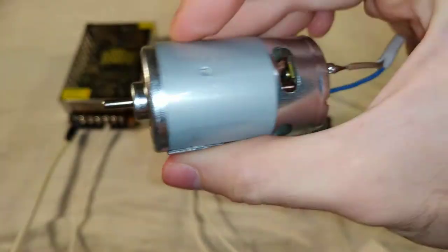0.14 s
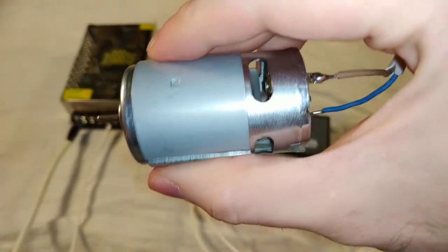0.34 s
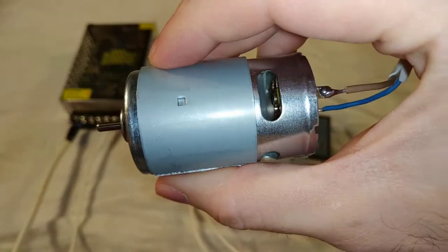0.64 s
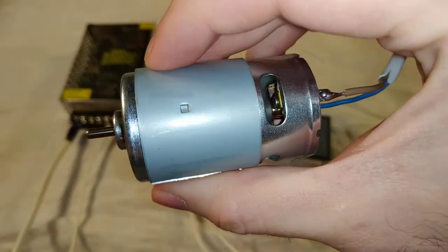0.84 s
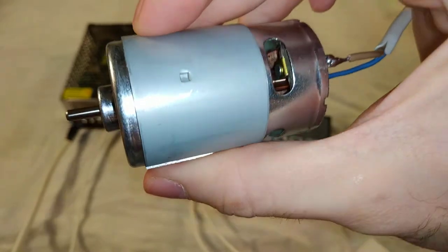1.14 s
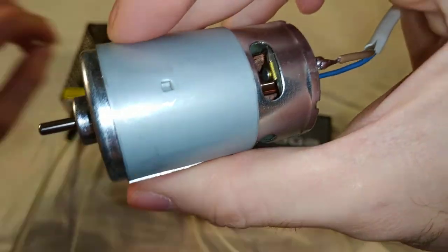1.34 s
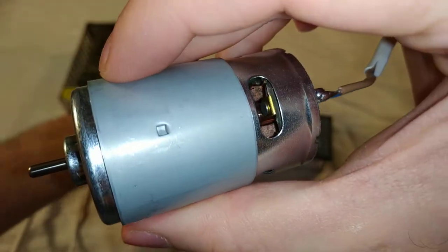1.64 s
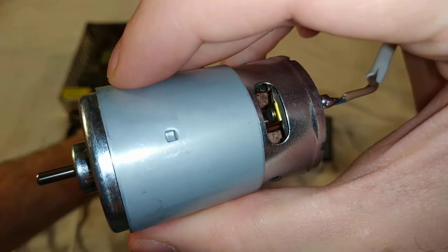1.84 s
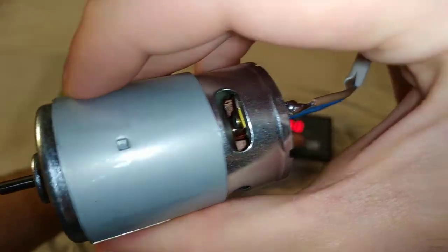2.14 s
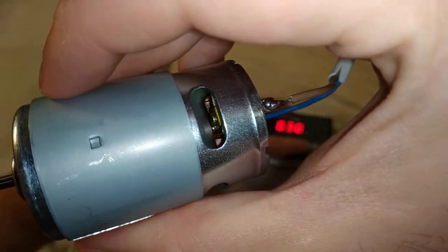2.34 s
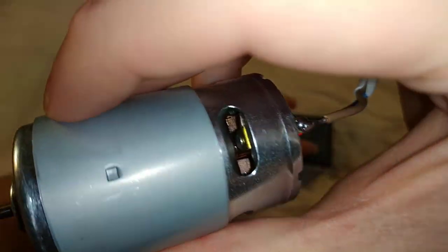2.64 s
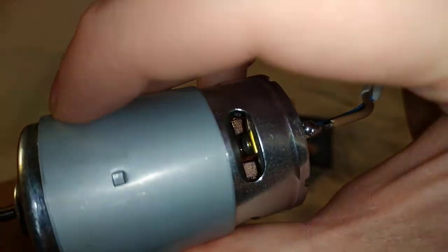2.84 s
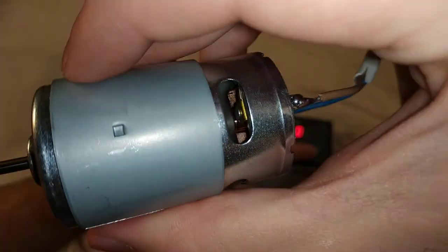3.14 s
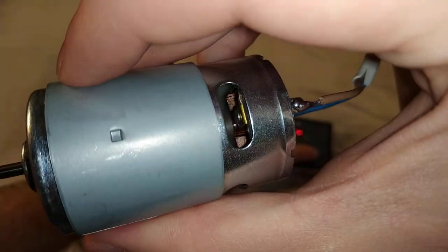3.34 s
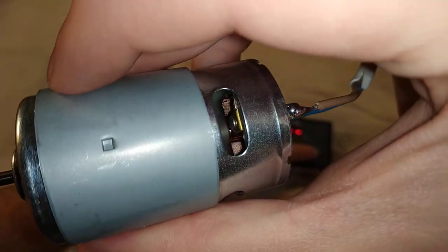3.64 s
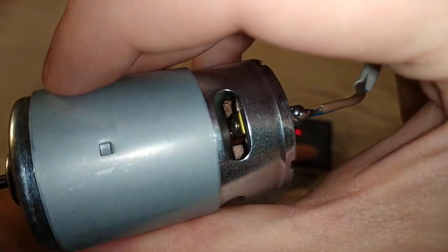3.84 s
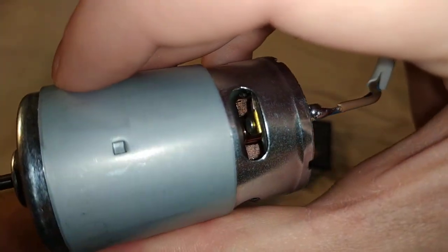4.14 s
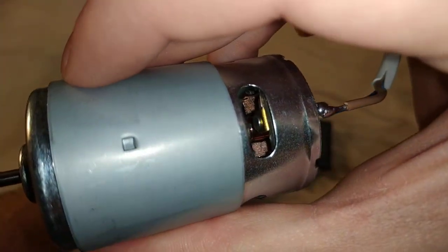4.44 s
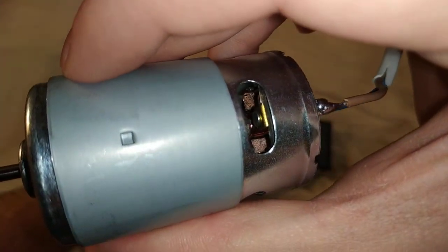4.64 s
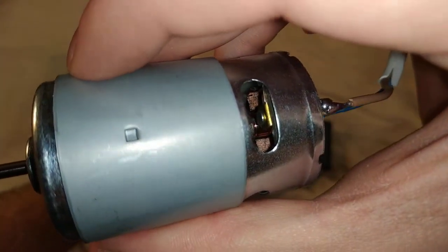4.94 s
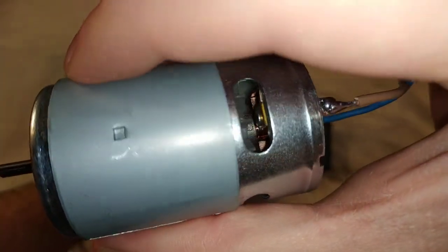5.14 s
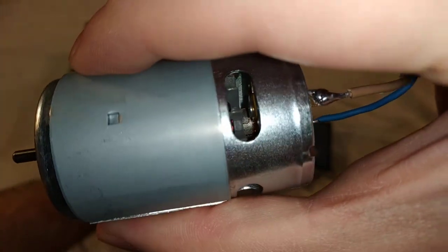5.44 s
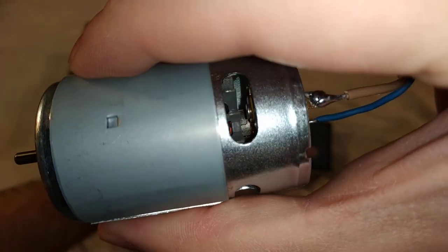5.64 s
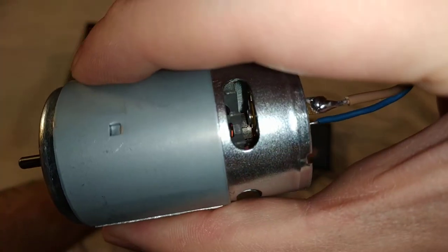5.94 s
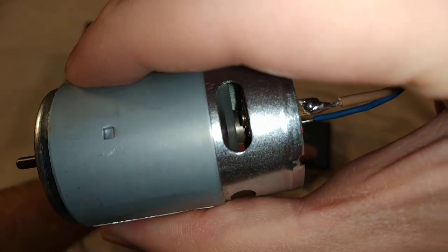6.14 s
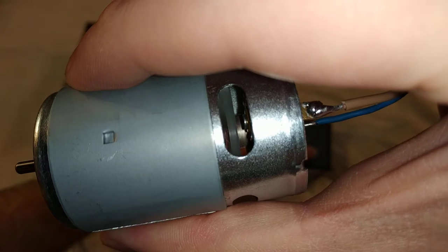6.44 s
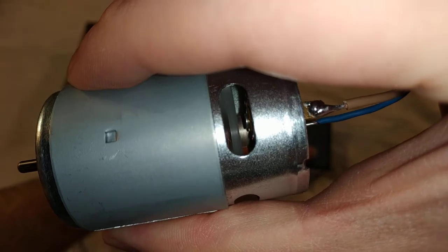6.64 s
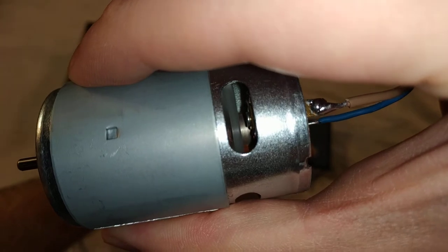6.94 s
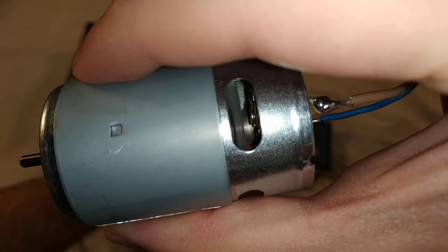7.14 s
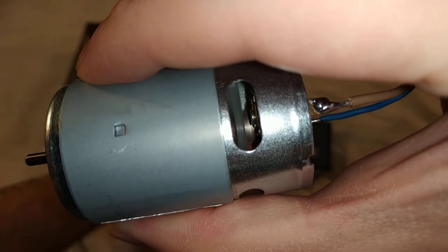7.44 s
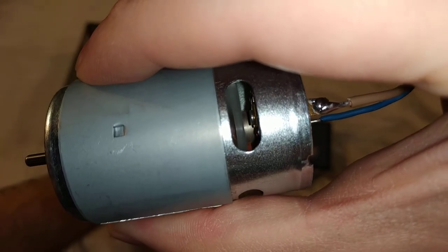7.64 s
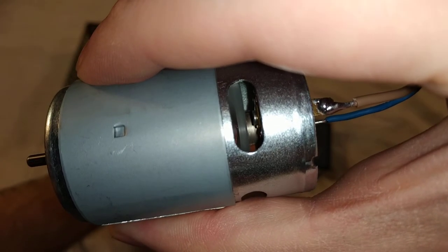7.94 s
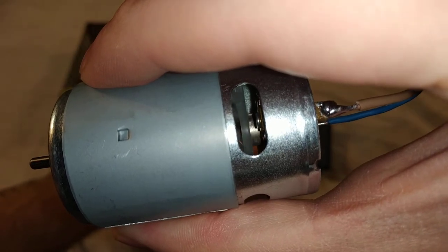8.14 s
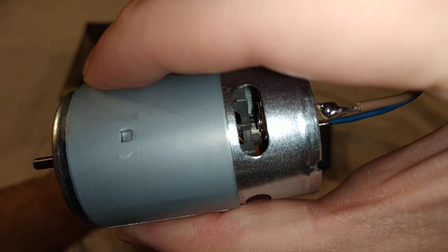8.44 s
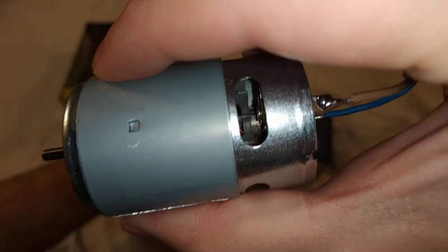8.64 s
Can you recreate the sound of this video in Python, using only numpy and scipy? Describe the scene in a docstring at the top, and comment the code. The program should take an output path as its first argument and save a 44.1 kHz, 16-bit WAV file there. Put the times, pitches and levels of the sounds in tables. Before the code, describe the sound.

A small electric motor whines and hisses steadily, winds down to a rattling stop, clicks twice, then briefly spins up and dies away again.

```python
"""In a quiet, small furnished room, a little brushed DC motor held in the hand runs at full speed.
It is turned down to a stop, the speed knob clicks, and the motor swells up and dies away once more.
At the end the hand moves with a rustle; just before a thin rising squeak there is a faint soft tap.
One shaft angle times the whine, the knocks and ticks of the commutator, the bearings' rattle and the
brushes' rasp and chatter; filtered noise makes air and skin, and dying sine waves make bumps and clicks."""
import sys
import numpy as np
from scipy import signal
from scipy.io import wavfile
from scipy.ndimage import uniform_filter1d

SR = 44100
rng = np.random.default_rng(int(sys.argv[2]) if len(sys.argv) > 2 else 0)


def pcm_store(signal):
    """Save signal as 16-bit PCM."""
    levels = np.round(np.clip(np.atleast_2d(signal), -1, 1) * 32767)
    wavfile.write(sys.argv[1], SR, levels.astype(np.int16).T)


N = 388074
T = np.arange(N) / SR  # time of every sample, seconds
FULL_SPEED = 112.5  # turns a second that count as speed 1


def gain_of(db):
    """Turns decibels into a factor to multiply by."""
    return 10 ** (np.asarray(db) / 20)


def evened(x):
    """Scales a signal so that its rms (its average strength) is 1."""
    return x / np.sqrt(np.mean(x ** 2) + 1e-20)


def drifting(shape, size, **options):
    """Random wandering of rms 1: noise smoothed over size steps."""
    return evened(uniform_filter1d(rng.standard_normal(shape), size=size, **options))


def read(points, hz):
    """Reads a table of (pitch, value) at any pitch, on a logarithmic pitch axis."""
    table_hz, value = np.transpose(points)
    return np.interp(np.log(hz + 1), np.log(table_hz + 1), value)


def curve(rows, axis=1):
    """Reads one column of a time table at every sample."""
    rows = np.array(rows)
    return np.interp(T, rows[:, 0], rows[:, axis])


def add(mix, start_s, sound):
    """Adds a sound into the mix at a given time."""
    part = mix[round(start_s * SR):][:len(sound)]
    part += sound[:len(part)]


def coloured(x, points, size=2048):
    """Filters a sound to a given colour; the filter has energy 1 and answers only after the input."""
    level_db = np.maximum(read(points, abs(np.fft.fftfreq(size, 1 / SR))), -100)
    log_gain = np.log(gain_of(level_db))
    taps = np.fft.ifft(np.exp(np.conj(signal.hilbert(log_gain)))).real
    taps /= np.linalg.norm(taps)
    return signal.oaconvolve(np.atleast_2d(x), taps[None], axes=1)[:, :N]


def pair(x, likeness):
    """Makes two unrelated channels partly alike: 0 is unrelated, 1 is identical."""
    c = np.clip(likeness, 0, 1)
    return np.array([x[0], c * x[0] + np.sqrt(1 - c * c) * x[1]])


def panned(x, db):
    """Makes the left channel louder than the right by db; a negative value favours the right."""
    return x * gain_of(np.array([db, -db]).reshape(2, -1) / 2)


def noise(points, likeness):
    """Stereo noise of the given colour."""
    return coloured(pair(rng.standard_normal((2, N)), likeness), points)


def low_cut(x, hz=190, order=4):
    """Takes out the bass, which the small microphone hardly hears."""
    return signal.sosfilt(signal.butter(order, hz, "highpass", fs=SR, output="sos"), x)


def dying_note(t, hz, t60, db=0):
    """A sine wave that starts at db and falls by 60 dB in t60 seconds."""
    return gain_of(db - 60 * t / t60) * np.sin(2 * np.pi * hz * t)


def pulses(turns, angles, sizes, jitter_s):
    """One pulse each time the shaft passes an angle; sizes is turns x angles."""
    when = np.interp(np.arange(len(sizes))[:, None] + angles, turns, T)
    when = when + jitter_s * rng.standard_normal(when.shape)
    at = np.clip(when * SR, 2, N - 4).ravel()
    # a pulse falls between samples, so it is shared among the four nearest
    near = at.astype(int) + np.arange(-1, 3)[:, None]
    share = np.sinc(near - at) * np.sinc((near - at) / 2)
    return np.bincount(near.ravel(), (sizes.ravel() * share).ravel(), N)


# colour of the quiet room's noise: (pitch_hz, relative level_db)
QUIET_COLOUR = [(15, -53), (25, -9), (38, -63), (87, -16), (134, -19.5), (200, 3.5), (223, 0), (641, -8),
                (1330, -12), (1740, -13), (2000, -13.5), (2550, -12.5), (5000, -13.5), (16000, -10)]


def quiet_room():
    """The faint steady noise of the quiet room, nearly unrelated left and right."""
    return gain_of(-57.5) * noise(QUIET_COLOUR, 0.045)


# how long echoes last at each pitch: (pitch_hz, t60_s, the time to fall by 60 dB)
ECHO_TIMES = [(150, 0.089), (900, 0.19), (4000, 0.3), (9000, 0.17), (16000, 0.067)]


def room_echo(x, size=16384):
    """A small furnished room: a smooth noise-like tail in which middle pitches last longest."""
    first_echo_s = .003
    taps = rng.standard_normal((2, size)) * (np.arange(size) > first_echo_s * SR)
    hz, t, spectrum = signal.stft(taps, SR, nperseg=256)
    fade = gain_of(-60 * t / read(ECHO_TIMES, hz)[:, None])
    tail = signal.istft(spectrum * fade, SR, nperseg=256)[1]
    return signal.oaconvolve(x, tail / np.linalg.norm(tail[0]), axes=1)[:, :N]


# colour of the air stirred by the rotor: (pitch_hz, relative level_db)
AIR_COLOUR = [(30, -49), (70, -26), (120, -14), (210, 8), (330, 5), (600, -6), (950, -9.5), (1300, -5.5),
              (2500, -9), (4000, -11)]


def stirred_air(speed):
    """The spinning rotor stirs the air: a soft noise that grows with speed."""
    return panned(gain_of(-52.0) * speed ** 1.62 * noise(AIR_COLOUR, 0.69), -11)


# colour of skin and sleeve: (pitch_hz, relative level_db)
RUSTLE_COLOUR = [(35, -95), (60, -85), (198, -6), (262, -5), (338, 2.5), (698, -9), (842, 3), (991, -12.5),
                 (1470, -18), (4030, -26), (4420, -34), (10300, -24), (16000, -30)]
# one list for each movement of the hand: (time_s, level_db)
HAND_MOVES = [
    [(4.95, -88), (5.25, -65), (5.55, -71), (6, -70)],
    [(8.22, -73), (8.38, -64), (8.5, -53.5), (8.6, -53), (8.68, -48.5), (8.8, -48.5)],
]
# thin squeaks as the hand moves off: (start_s, start_pitch_hz, end_pitch_hz, end level_db)
SQUEAKS = [(8.69, 6000, 7200, -56), (8.7, 6700, 9200, -55), (8.73, 7600, 10500, -53),
           (8.62, 8800, 13000, -61), (8.73, 14200, 15700, -59)]


def hand():
    """Skin and sleeve rustle as the hand shifts; at the last, thin sine tones rise as a squeak."""
    level = 0
    for rows in HAND_MOVES:
        level = level + gain_of(np.interp(T, *np.transpose(rows), left=-120, right=-120))
    squeak = np.zeros(N)
    for start_s, start_hz, end_hz, db in SQUEAKS:
        u = np.linspace(0, 1, N - round(start_s * SR))
        hz = start_hz + (end_hz - start_hz) * u
        hz = hz + 110 * drifting(len(u), 30)  # the pitch trembles by about 110 Hz
        add(squeak, start_s, gain_of(db) * u ** 0.74 * np.sin(2 * np.pi * np.cumsum(hz) / SR))
    return panned(level * noise(RUSTLE_COLOUR, 0.79) + squeak, -4.5)


# dull finger bumps: (start_s, relative level_db, ring pitch_hz, ring t60_s, thud level_db against the ring)
FINGER_BUMPS = [(1.97, -5, 980, 0.0064, -13), (1.979, -16, 720, 0.0089, -6.5),
                (3.2193, -9, 900, 0.0049, -25), (3.5056, -14.5, 930, 0.014, -11.5),
                (7.0546, -9.5, 940, 0.0058, -22), (7.305, -14.5, 910, 0.012, -12),
                (8.508, -22.5, 1060, 0.0097, -31), (8.516, -30, 970, 0.014, -22),
                (8.795, -27, 800, 0.0059, 0)]


def bumps():
    """A soft finger blow sets off one short note, a low thud and a tap, and faintly rings the can."""
    out, t = np.zeros(N), np.arange(SR // 10) / SR
    tap = dying_note(t, hz=1600, t60=0.0057, db=-9)
    snap = dying_note(t, hz=4300, t60=0.0081, db=-26)
    soft_start = 1 - np.exp(-t / 0.0058)
    for start_s, db, hz, t60, thud_db in FINGER_BUMPS:
        add(out, start_s, gain_of(min(db - 3, 0)) * snap)  # firmer blows ring the can more
        ring = dying_note(t, hz, t60)
        thud = dying_note(t, hz=420, t60=0.016, db=thud_db)
        add(out, start_s, gain_of(db + 12.5) * (ring + thud + tap) * soft_start)
    return panned(out, -0.38)


# two clicks of the knob's switch, then a faint soft tap just before the squeak:
# (start_s, relative level_db, brightness_db an octave, second blow after_s, its relative level_db)
CLICKS_AND_TAP = [(5.6156, -15, 4, .00147, 6), (5.838, -14, -1, .0022, 6.5), (8.514, -46, 9, 0.00124, 9.5)]
# notes of the switch: (pitch_hz, relative level_db, t60_s)
SWITCH_NOTES = [(274, -28, 0.035), (560, -21.5, 0.016), (930, -10.5, 0.011), (2340, -23.5, 0.013),
                (4130, -22, 0.007), (5270, -21, 0.0035), (8550, -20.5, 0.0023), (10600, -23, 0.0036)]
# weak, longer-lasting notes of the knob: (pitch_hz, relative level_db, t60_s)
KNOB_NOTES = [(890, -31.5, .12), (2480, -39.5, .12), (4150, -43, .06), (5400, -42, .05)]


def switch_and_tap():
    """The contact snaps over and seats a moment later, each blow a ring and a crack; so is the soft tap."""
    crack_db, crack_t60, crack_hz = -32, 0.031, (3800, 9000)
    crack_filter = signal.butter(1, crack_hz, "bandpass", fs=SR)
    out, t = np.zeros(N), np.arange(SR // 10) / SR
    sharp_start = 1 - np.exp(-t / 0.000087)
    for start_s, db, bright, second_s, second_db in CLICKS_AND_TAP:
        ring = 0
        for hz, note_db, t60 in SWITCH_NOTES + KNOB_NOTES:
            # tilts the notes around 1200 Hz: a positive brightness lifts the higher ones
            ring = ring + dying_note(t, hz, t60, note_db + bright * np.log2(hz / 1200))
        for delay_s, blow_db in ((0, -2), (second_s, second_db)):
            grit = signal.lfilter(*crack_filter, rng.standard_normal(len(t)))
            crack = gain_of(crack_db + 3.9 * bright - 60 * t / crack_t60) * grit
            add(out, start_s + delay_s, gain_of(db + blow_db) * (ring + crack) * sharp_start)
    return panned(out, 0.38)


# runs of the motor, also read by the brushes and the whine:
# (turned up at_s, turned down at_s, top speed in turns a second before the slow creep)
MOTOR_RUNS = [(-.908, 3.225, 112.26), (5.873, 7.066, 111.52)]
SECOND_RUN_S = MOTOR_RUNS[1][0]
# spin-up: a steady climb that settles onto the top speed, which creeps up as the bearings warm
CLIMB_HZ_PER_S, SETTLE_HZ, SETTLE_S, CREEP_HZ_PER_S = 136.4, 7.4, .12, .1
# spin-down: the braking sets in softly and grows until the shaft stands
BRAKE_HZ_PER_S, BRAKE_ONSET_S, BRAKE_HZ_PER_S2 = 67.6, .184, 103.4
STICK_S, LOOSEN_S = .075, .07  # the shaft sticks at first, then breaks loose


def shaft():
    """Turns a second: in each run the shaft climbs, settles, and is braked to a stop."""
    hz = np.zeros(N)
    for on_s, off_s, top in MOTOR_RUNS:
        age, late = np.maximum(T - on_s, 0), np.maximum(T - off_s, 0)
        settling = np.maximum(age - (top - SETTLE_HZ) / CLIMB_HZ_PER_S, 0)
        settled = top - SETTLE_HZ * np.exp(-settling / SETTLE_S)
        driven = np.minimum(CLIMB_HZ_PER_S * age, settled) + CREEP_HZ_PER_S * age
        soft_onset = late - BRAKE_ONSET_S * (1 - np.exp(-late / BRAKE_ONSET_S))
        braked = BRAKE_HZ_PER_S * soft_onset + BRAKE_HZ_PER_S2 * late ** 2 / 2
        loose = np.clip((age - STICK_S) / LOOSEN_S, 0, 1)
        hz += np.maximum(driven - braked, 0) * loose
    return hz


# colour of the bearings' rattle: (pitch_hz, relative level_db)
RATTLE_COLOUR = [(150, -23), (450, -3), (700, -5.5), (880, 1), (1080, -4.5), (1300, -9), (2500, -11.5),
                 (3500, -14.5), (8000, -21)]


def bearings(turns, speed, count=24):
    """Loose bearings rattle in small uneven knocks, count a turn, softened towards full speed."""
    rattle_db, uneven_db, soften_db = -30, 4, -13
    shape = (2, int(turns[-1]), count)
    sizes = gain_of(uneven_db * rng.standard_normal(shape)) * rng.choice([-1, 1], shape)
    angles = np.arange(count) / count
    grains = np.array([pulses(turns, angles, side, jitter_s=3e-4) for side in sizes])
    rattle = coloured(pair(grains, 0.66), RATTLE_COLOUR)
    return panned(rattle * speed * gain_of(rattle_db + soften_db * speed ** 2), -7.5)


# commutator gaps passing the two brushes: (angle in turns, relative level_db)
COMMUTATOR_GAPS = [(0, 1), (.167, 1.5), (.333, -1), (.5, -4), (.667, -2), (.833, -3)]
# colour of one knock of the commutator: (pitch_hz, relative level_db)
KNOCK_COLOUR = [(100, -17), (220, -12), (480, -3), (750, 4), (1000, 2), (1300, -16), (1800, -15),
                (2500, -16), (3300, -20), (5000, -12), (12000, -34)]
# colour of the tick of the one high commutator bar: (pitch_hz, relative level_db)
TICK_COLOUR = [(200, -14), (750, -2), (1000, -2), (1350, -9), (1900, -1), (2700, -1), (3400, -14),
               (5000, -10), (12000, -32)]
KNOCK_UNEVEN_DB, KNOCK_JITTER_S = 2.2, 6e-5  # the knocks are nearly regular
KNOCK_DB, KNOCK_SOFTEN_DB = -28, -20  # softened in step with speed
TICK_ANGLE, TICK_DB, TICK_SOFTEN_DB = .36, -26.5, -13  # angle in turns


def commutator(turns, speed, crawl=0.32):
    """Each gap knocks the can and one high bar ticks once a turn; at a crawl the knocks come apart."""
    angles, db = np.transpose(COMMUTATOR_GAPS)
    count = int(turns[-1])
    sizes = gain_of(db + KNOCK_UNEVEN_DB * rng.standard_normal((count, len(angles))))
    knocks = coloured(pulses(turns, angles, sizes, KNOCK_JITTER_S), KNOCK_COLOUR)
    knocks = knocks * gain_of(KNOCK_DB + KNOCK_SOFTEN_DB * speed)
    sizes = gain_of(KNOCK_UNEVEN_DB * rng.standard_normal((count, 1)))
    ticks = coloured(pulses(turns, np.array([TICK_ANGLE]), sizes, KNOCK_JITTER_S / 2), TICK_COLOUR)
    ticks = ticks * gain_of(TICK_DB + TICK_SOFTEN_DB * speed ** 2)
    # both fade out below the crawling speed, a share of full speed
    return panned((knocks + ticks) * np.minimum(speed / crawl, 1), -5.0)


def rasp(turns, fresh=1.0, jitter_s=2e-6, count=160):
    """The brushes meet the same scratches each turn; the pattern wears slowly and trembles over a few turns."""
    shape = (int(turns[-1]), count)
    worn = drifting(shape, 130, axis=0, mode="wrap")
    tremble = evened(signal.lfilter([1], [1, -.62], rng.standard_normal(shape), axis=0))
    angles = (np.arange(count) + rng.random(count)) / count
    return evened(pulses(turns, angles, worn + fresh * tremble, jitter_s))


# brush chatter, once a turn: (angle in turns, relative level_db, middle pitch_hz, length_s)
CHATTER_SPOTS = [(.83, -11.5, 10420, 0.00074), (0.97, -15.5, 12140, 0.00106), (.2, -14.5, 6800, 0.00104),
                 (0.46, -6, 8760, 0.00113), (0.27, -34, 5900, 0.00093)]
WANDER_DB = 2.8  # how far the chatter's loudness wanders slowly


def chatter(turns, jitter_s=8e-6, sweep=0.31):
    """At a few angles a brush hops and buzzes for about a millisecond, its note sagging as it settles."""
    out, shape = np.zeros((2, N)), (int(turns[-1]), 1)
    for angle, db, hz, length_s in CHATTER_SPOTS:
        wander = drifting(shape, 60, axis=0, mode="wrap")
        sizes = rng.uniform(.7, 1.3, shape) * gain_of(WANDER_DB * wander)
        hops = pulses(turns, np.array([angle]), sizes, jitter_s)
        u = np.linspace(0, 1, round(length_s * SR))
        # the note falls from a share sweep above the middle pitch to as far below
        phase = 2 * np.pi * hz * length_s * (u + sweep * u * (1 - u))
        swell = np.sin(np.pi * np.sqrt(u)) ** 2
        buzz = swell * np.sin(phase + np.array([[0], [1.5]]))
        out += gain_of(db) * evened(signal.oaconvolve(hops[None], buzz, axes=1)[:, :N])
    return out


# brush noise grows as a power of the speed and levels off near the knee (a share of full speed)
BRUSH_DB, BRUSH_POWER, BRUSH_KNEE = -19, 1.85, 1
DIP_DB, DIP_AFTER_S, DIP_WIDTH_S = -3, 0.22, 0.018  # the brushes ease briefly after the turn-down


def brush_level(speed, second_db=0.6):
    """Gain of the brush noise: it follows the speed, and dips as the drive lets go."""
    growth = (speed / BRUSH_KNEE) ** BRUSH_POWER
    dip = 0
    for _, off_s, _ in MOTOR_RUNS:
        dip = dip + np.exp(-((T - off_s - DIP_AFTER_S) / DIP_WIDTH_S) ** 2)
    level_db = BRUSH_DB + DIP_DB * dip + second_db * (T > SECOND_RUN_S)
    return gain_of(level_db) * growth / np.hypot(1, growth)


# colour of the brush noise as the motor is held at first: (pitch_hz, relative level_db)
FIRST_COLOUR = [(1760, -32), (3000, -17.5), (3220, -24), (3590, -6.5), (4070, -7.5), (4360, 2), (6250, 5.5),
                (6840, 4.5), (8080, -1.5), (10300, 5.5), (11200, 3), (14200, 8), (15700, 2)]
# the same with the motor held nearer: (pitch_hz, relative level_db)
NEAR_COLOUR = [(1760, -26.5), (3000, -9.5), (3220, -34), (3400, -9), (3880, -23), (4150, 0.5), (4650, -3.5),
               (4950, 1.5), (5500, -2), (6500, 3), (8130, -3), (9300, -5), (10600, 5.5), (11800, -7.5),
               (14700, 3), (15700, -6.5)]
# the same in the second run: (pitch_hz, relative level_db)
SECOND_COLOUR = [(1760, -25.5), (2950, -8.5), (3300, -25), (3700, -8.5), (3900, -23.5), (4080, 3),
                 (4450, 5), (4700, 5), (4950, 7.5), (5600, 2.5), (6400, 5.5), (7910, 2.5), (8800, 9),
                 (9900, -7), (10600, 5), (11700, -4.5), (12600, 6.5), (13400, 5), (14100, 7), (15100, -3),
                 (15700, 5.5)]
# where the hand holds the motor, one list a run: (time_s, left over right_db)
HAND_HOLD = [
    [(0.0, -1.5), (0.3, -3), (1.95, -4), (2.28, -1.5), (3.38, -3), (4.1, -4)],
    [(6.05, -5), (7.33, -1.5), (7.368, -4), (7.88, -3.5), (7.956, -4), (8.0, -6)],
]
THIN_HZ, THIN_DB = (3900, 6700), -6  # the brush noise thins out in this band at full speed


def brushes(turns, speed):
    """Rasp, smooth sliding hiss and chatter; the hiss takes over when the shaft crawls."""
    slide_db, crawl_db = -19, -2
    chatter_db, second_chatter_db, far_chatter_db = 1, -2, -7
    scratches = pair([rasp(turns), rasp(turns)], 0.18) * speed ** .5
    hiss_level = gain_of(slide_db) + gain_of(crawl_db) * (1 - speed) ** 2
    drive = scratches + hiss_level * pair(rng.standard_normal((2, N)), 0.089)

    near = curve([(1.7, 0.14), (2.3, 0.76)])  # (time_s, share of the nearer colour)
    second = T > SECOND_RUN_S
    first = (1 - near) * coloured(drive, FIRST_COLOUR) + near * coloured(drive, NEAR_COLOUR)
    sound = np.where(second, coloured(drive, SECOND_COLOUR), first)
    buzz_db = chatter_db + second_chatter_db * second + far_chatter_db * (near[-1] - near)
    sound = sound + gain_of(buzz_db) * speed ** .5 * chatter(turns)

    # even out the slow changes of loudness before the level and thinning are set
    sound /= np.sqrt(uniform_filter1d((sound ** 2).mean(0), size=6000))
    thin_filter = signal.butter(3, THIN_HZ, "bandpass", fs=SR, output="sos")
    band = signal.sosfiltfilt(thin_filter, sound)
    sound = sound - (1 - gain_of(THIN_DB)) * speed ** 8 * band
    return panned(sound, curve(np.vstack(HAND_HOLD))) * brush_level(speed)


# response of the can to the rotor: (pitch_hz, level_db)
CAN_RESPONSE = [(60, -30), (150, -24), (330, -11), (520, -4), (670, -6), (850, 0), (1050, 0), (1170, -9),
                (1500, -7), (1900, -6), (2400, -9), (3800, -12), (4200, 9), (8000, 6)]
RING_HZ, RING_WIDTH_HZ, RING_DB = 886, 90, 1.5  # the sharpest resonance of the can


def can_db(hz):
    """The can's broad response with its one sharp ring on top."""
    return read(CAN_RESPONSE, hz) + RING_DB * np.exp(-((hz - RING_HZ) / RING_WIDTH_HZ) ** 2)


# the even comb of weak lines at low multiples of the shaft speed: (pitch_hz, relative level_db)
WEAK_LINES = [(330, -60), (450, -62), (680, -64), (850, -66), (1150, -63), (1750, -68), (2250, -66),
              (2700, -71), (3150, -66), (4000, -62)]
# lines that stand out at full speed:
# (multiple of the shaft speed, relative level_db in the first run, relative level_db in the second)
LOUD_LINES = [(3, -54, -53), (5, -55.5, -57), (6, -60, -58), (7, -58, -56), (9, -46, -46.5), (10, -58, -59),
              (11, -60, -59), (12, -59, -61), (14, -56, -59), (17, -58, -57), (19, -56, -56),
              (20, -57, -60), (21, -56, -61), (24, -56, -64), (26, -53.5, -58), (27, -54, -58),
              (31, -55, -63), (34, -56, -55), (38, -38, -44), (40, -35.5, -36), (43, -43, -46),
              (44, -38, -39), (47, -40, -45), (50, -46, -41), (51, -39.5, -42), (53, -45, -55),
              (57, -46, -37), (59, -42, -48), (60, -38.5, -43), (61, -36.5, -38), (63, -37.5, -43),
              (64, -38, -37), (76, -41, -44), (93, -38, -45), (95, -40, -52), (116, -42, -46),
              (126, -39, -40), (130, -41, -46)]
# the rotor's teeth tug at the magnets, heard below full speed:
# (multiple of the shaft speed, relative level_db)
TOOTH_TUGS = [(3, -42), (6, -46), (8, -48), (9, -46), (10, -51), (12, -44), (15, -54), (16, -48), (18, -49),
              (24, -53), (30, -57)]
COG_SPEED = 0.49  # the tugging fades under this share of full speed
WHINE_DB, WHINE_FADE = .5, 1  # overall gain, and the least power of the speed with which lines fade
HUM_ROUGH = .25  # unsteadiness of the low hum under the main whine


def whine(turns, speed, count=36, size=64):
    """Clean multiples of the shaft speed, each swelling as it slides through a resonance of the can."""
    scatter_db, waver_db, fade_hz, rough = -0.5, 1.5, 1000, 1.0
    out, slow, t = np.zeros((2, N)), speed[::size], T[::size]  # levels need only every 64th sample
    lines = {}
    for k in range(3, count + 1):
        lines[k] = read(WEAK_LINES, k * FULL_SPEED) + scatter_db * rng.standard_normal()
    for k, first_db, second_db in LOUD_LINES:
        lines[k] = np.where(t > SECOND_RUN_S, second_db, first_db)  # replaces any weak line
    tugs = dict(TOOTH_TUGS)
    slack = np.clip(1 - slow ** 4, 0, 1)  # 0 at full speed

    for k, db in lines.items():
        hz = k * FULL_SPEED
        waver = np.interp(t, np.linspace(0, T[-1], 45), rng.standard_normal(45))
        db = db + min(hz / 2500, 1) * waver_db * waver  # high lines waver more
        power = WHINE_FADE + min(hz / fade_hz, 7) ** 2 / 4  # high lines need speed
        driven = gain_of(db - can_db(hz)) * slow ** power
        if k > count:  # high lines turn rough below full speed
            driven = driven * (1 + rough * np.sqrt(slack) * drifting(len(t), 6))
        if k < 9:
            hum = np.abs(1 + HUM_ROUGH * drifting(len(t), 14))
            driven = driven * hum / np.hypot(1, HUM_ROUGH)
        cogging = gain_of(tugs.get(k, -120)) * slack * np.sqrt(slow) * np.minimum(slow / COG_SPEED, 1)
        strength = np.hypot(driven, cogging) * gain_of(can_db(hz * slow))
        strength = np.interp(T, t, strength)
        phase = (2 * np.pi * ((k * turns + rng.random()) % 1)).astype(np.float32)
        lag = np.float32(min(hz / 1200, 1.4))  # radians: the left, far microphone port hears it later
        out += strength * np.array([np.cos(phase - lag), np.cos(phase)])
    return panned(gain_of(WHINE_DB) * out, -2.5)


def scene():
    """The motor, the knob and the hand in a quiet room."""
    shaft_hz = uniform_filter1d(shaft(), size=2000)
    flutter = 0.000223 * drifting(N, 1500)  # tiny unsteadiness, a share of the speed
    turns = np.cumsum(np.maximum(shaft_hz * (1 + flutter), 1e-6)) / SR
    speed = np.maximum(shaft_hz, 0) / FULL_SPEED

    motor = bearings(turns, speed) + commutator(turns, speed) + brushes(turns, speed)
    close = low_cut(motor + bumps()) + stirred_air(speed) + hand()
    clicks = low_cut(switch_and_tap(), hz=260, order=2)
    lines = low_cut(whine(turns, speed))
    echo = room_echo(gain_of(-6.5) * close + gain_of(-21.5) * lines + gain_of(-6.0) * clicks)
    return quiet_room() + echo + close + clicks + lines


EDGE_HZ = 15850  # the treble ends here


def record(dry):
    """Cuts off the highest treble with a steep, symmetrical low-pass filter."""
    taps = signal.firwin(511, EDGE_HZ, window=("kaiser", 9), fs=SR)
    return signal.oaconvolve(dry, taps[None], "same")


dry = scene()
out = record(dry)
pcm_store(out)
```